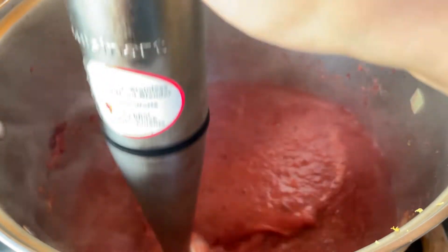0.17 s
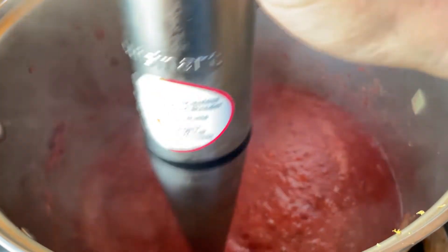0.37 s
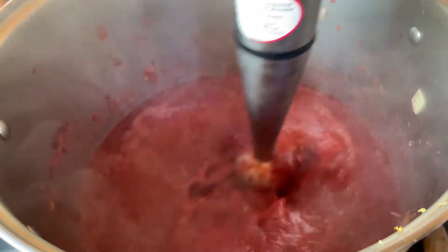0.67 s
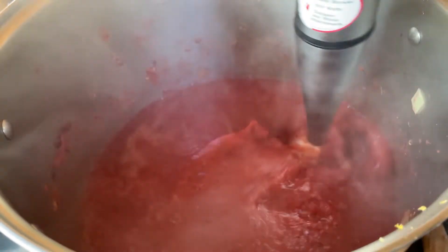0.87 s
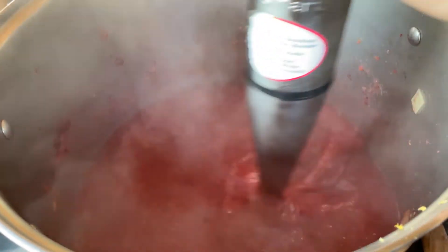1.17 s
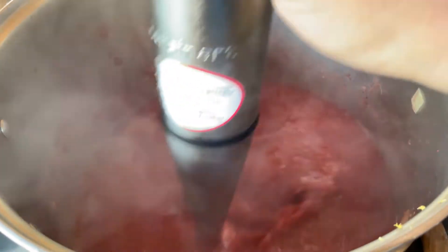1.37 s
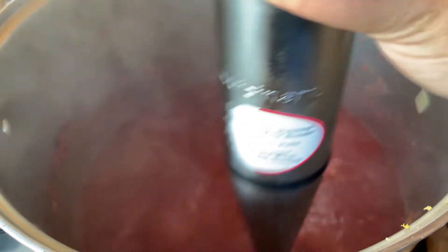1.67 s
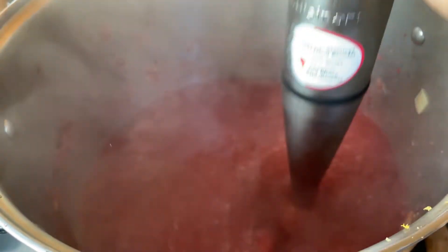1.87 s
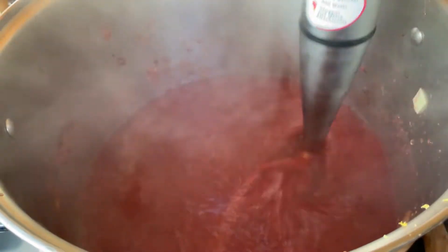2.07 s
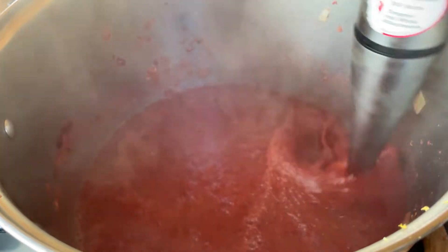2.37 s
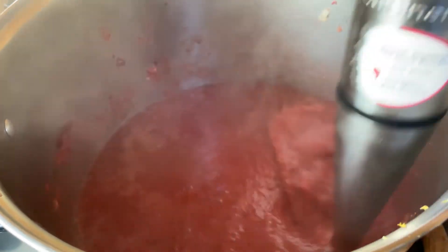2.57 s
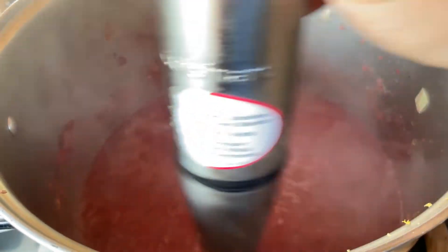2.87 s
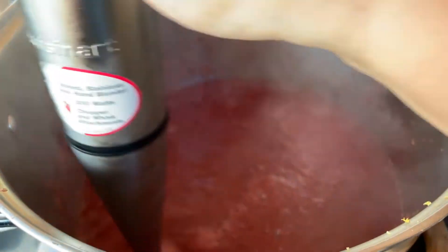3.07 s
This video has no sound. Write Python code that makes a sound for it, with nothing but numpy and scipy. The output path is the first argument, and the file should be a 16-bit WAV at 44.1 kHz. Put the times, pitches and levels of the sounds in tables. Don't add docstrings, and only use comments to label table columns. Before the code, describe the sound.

A hand blender beats thick sauce in a steel pot, its low boomy hum surging and dropping out, with wet splats and spatter, then stopping near 2.5 seconds; close phone microphone, stereo.

```python
import sys
import numpy as np
from scipy import signal
from scipy.fft import rfft, irfft, next_fast_len
from scipy.io import wavfile
from scipy.ndimage import uniform_filter1d, map_coordinates

SR = 44100
rng = np.random.default_rng(int(sys.argv[2]) if len(sys.argv) > 2 else 0)


def to_linear_factor(level_db):
    exponent = np.asarray(level_db, float) / 20
    return 10 ** exponent


def dump(signal):
    limited = np.clip(np.atleast_2d(signal).T, -1, 1)
    pcm = np.round(limited * 32767).astype(np.int16)
    wavfile.write(sys.argv[1], SR, pcm)


N = 141120

# (t/s, boom level/dB, once-a-turn thud over the boom/dB, smooth running 0-1)
MOTOR_RUN = [(0, -25, -22, 0.04), (.18, -43, -4, 0), (.39, -14.5, -19.5, 0.2), (.88, -20, -14.5, 0.84),
             (.97, -35, -13, 0.02), (1.1, -41.5, -14, 0.44), (1.2, -14, -24, 0.7), (1.41, -24.5, -20.5, 1),
             (1.47, -18.5, -15.5, 0.86), (1.6, -19, -34.5, 0.9), (1.67, -14, -2.5, 0),
             (1.745, -15.5, -6.5, 0.96), (1.86, -28, -32, 0.4), (1.95, -18.5, -16, 0.25),
             (2.29, -18, -27, 0.1), (2.36, -5.5, -34, 0.76), (2.505, -23.5, -22, 0.16),
             (2.53, -42.5, -6.5, 0.1)]
# (t/s, f/Hz); two blades, so the shaft turns at half of this
BLADE_SPEED = [(0, 372), (.3, 352), (.36, 325), (.4, 346), (.7, 333), (.88, 327), (.96, 290), (1.12, 280),
               (1.2, 320), (1.3, 333), (1.6, 327), (1.67, 314), (1.76, 330), (1.84, 350), (2.3, 352),
               (2.36, 341), (2.5, 355)]
SIDES = np.array([[.5], [-.5]])


def unit(x):
    return x / np.sqrt(np.mean(x ** 2) + 1e-20)


def along(points, hz):
    f, v = np.transpose(points)
    return np.interp(np.log(hz + 1), np.log(f + 1), v)


def curves(rows):
    s, *cols = np.transpose(rows)
    return [np.interp(np.arange(N) / SR, s, c) for c in cols]


def wobble(rate):
    return map_coordinates(rng.standard_normal(N // 20), [np.arange(N) * rate / SR])


def filtered(x, response):
    m = next_fast_len(N + 8192)
    return irfft(rfft(x, m) * response(np.fft.rfftfreq(m, 1 / SR)), m)[..., :N]


def uneven(draw, spread_db):
    return to_linear_factor(-spread_db * np.log(draw + 0.012))


def spread(pair, spectrum):
    # (f/Hz, left-right likeness 0-1)
    likeness = [(100, 0.91), (300, 1), (800, 0.55), (3000, 0.67), (7000, 0.34), (12000, 0.94)]

    def response(hz):
        turn = np.arccos(np.clip(along(likeness, hz), -1, 1)) / 2
        return to_linear_factor(along(spectrum, hz)) * [np.cos(turn), np.sin(turn)]

    mid, side = filtered(pair, response)
    return unit(np.array([mid + side, mid - side]))


def patchy(patchy_db):
    z = signal.stft(rng.standard_normal((2, N)), nperseg=256)[2]
    field = uniform_filter1d(rng.standard_normal(z.shape[1:]), size=8, axis=0)
    field = uniform_filter1d(field, size=5, axis=1)
    return unit(signal.istft(z * to_linear_factor(patchy_db * unit(field)), nperseg=256)[1][:, :N])


def hiss():
    # (f/Hz, level/dB per Hz)
    hiss_color = [(40, -10), (100, 16), (300, 2), (1000, -6), (5000, -8), (15500, -7), (17000, -120)]
    return to_linear_factor(-56) * spread(patchy(patchy_db=7.5), hiss_color)


def grip():
    # (t/s, rumble level/dB)
    grip_level = [(0, -51), (.1, -47), (1.62, -66), (1.7, -34), (2.4, -44), (3.2, -44.5)]
    # (f/Hz, level/dB per Hz)
    grip_color = [(15, -46), (40, -15.5), (120, 7.5), (280, 2.5), (450, -66)]
    return to_linear_factor(curves(grip_level)[0] + 3.5 * wobble(14)) * spread(patchy(patchy_db=1.5), grip_color)


def pot(f):
    # (f/Hz, width/Hz, level/dB)
    resonances = [(344, 34, 16), (825, 29, 3.5), (166, 48, -40), (1310, 1180, -21.5)]
    total = 0
    for k, (c, w, db) in enumerate(resonances):
        total = total + (-1) ** k * to_linear_factor(db) * 1j * f * w / (c * c - f * f + 1j * f * w)
    return total


def walls(x):
    t = np.arange(6000) / SR
    tail = rng.standard_normal((2, len(t))) * to_linear_factor(-60 * t / 0.18)
    return signal.fftconvolve(x, tail / np.linalg.norm(tail[0]), axes=1)[:, :N]


def pops(life_s):
    draw = rng.random((2, N))
    size = (draw[0] < 340 / SR) * uneven(draw[1], spread_db=4.5)
    puff = signal.fftconvolve(size, np.exp(-np.arange(800) / SR / life_s))[:N]
    return unit(puff * rng.standard_normal((2, N)))


def bubbles(count):
    d, t = rng.random((count, 4)), np.arange(256) / SR
    clump = np.cumsum(to_linear_factor(4.5 * wobble(40)))
    start = np.searchsorted(clump / clump[-1], d[:, :1])
    hz = 2250 * 2 ** (0.597 * rng.standard_normal((count, 1)))
    ring = np.exp(-t * hz / 2.3) * np.sin(2 * np.pi * hz * t * (1 + 25 * t))
    chirp = uneven(d[:, 1:2], spread_db=3) * ring
    at = (start + np.arange(len(t))).ravel()
    direction = 7 * d[:, 2:3]
    pair = [np.bincount(at, (chirp * w(direction)).ravel(), N)[:N] for w in (np.cos, np.sin)]
    return unit(np.array(pair))


def churn():
    # (t/s, churning level/dB, spray over it/dB, slosh over it/dB)
    stirring = [(.05, -33, -3, -2.5), (.3, -40.5, -2.5, 10.5), (.41, -23.5, -8.5, 5.5), (.6, -28, -6.5, 4),
                (.87, -36, -3, 13.5), (.93, -50, 2.5, 13.5), (1.18, -42.5, -4, 8), (1.6, -34.5, -7.5, 10),
                (1.655, -32, -11.5, 12), (1.675, -19.5, -9.5, 0.5), (1.74, -26.5, -8, 12),
                (1.85, -38, -7, 8), (2.33, -41, -7, 8.5), (2.375, -28.5, -6, 2), (2.42, -38.5, -3, 5),
                (2.85, -47.5, -0.5, 10), (3.14, -38.5, -7.5, 3), (3.165, -46, -10, 6)]
    # (f/Hz, level/dB per Hz)
    slosh_color = [(60, -44), (150, -4.5), (340, 8.5), (520, -9), (820, 0), (1600, -17), (3000, -96)]
    body_color = [(500, -28.5), (900, -4.5), (2500, -4.5), (4500, -11), (7500, -32), (10000, -100)]
    spray_color = [(3000, -7), (5500, -1.5), (8000, -2.5), (10000, -3), (12500, -9.5), (15500, -10.5),
                   (16200, -42), (17000, -120)]
    level_db, spray_db, slosh_db = curves(stirring)
    surge_db = 1.6 * wobble(29.63)
    slosh = spread(patchy(patchy_db=3.5), slosh_color) * to_linear_factor(0.5 + slosh_db + 0.86 * wobble(20))
    torn = patchy(patchy_db=4.0) + to_linear_factor(-8) * bubbles(count=5000)
    body = spread(torn, body_color) * to_linear_factor(-1 + surge_db)
    fizz = patchy(patchy_db=3.5) + to_linear_factor(-5.5) * pops(life_s=0.00024)
    spray = spread(fizz, spray_color) * to_linear_factor(1.5 + spray_db + surge_db)
    return to_linear_factor(level_db) * (slosh + body + spray)


def drops():
    # (t/s, peak level/dB, centre f/Hz)
    droplets = [(0.4085, -12.5, 8800), (0.4189, -17, 9900), (0.4359, -14, 8720), (0.5043, -22, 8950),
                (0.6479, -21.5, 12000), (0.6848, -16, 8810), (0.7274, -20, 9490), (0.7467, -20, 10100),
                (0.7614, -31, 10100), (0.7856, -21, 10000), (0.7984, -24, 11200), (0.8165, -19, 11100),
                (0.8629, -19, 11100), (1.4381, -21, 10900), (1.9714, -32, 11400), (2.8644, -37, 12100),
                (3.015, -30, 13600), (3.0824, -29, 11800), (3.1373, -23.5, 9260), (3.1954, -38, 11400)]
    out, t = np.zeros((2, N + SR)), np.arange(1024) / SR
    f = np.fft.rfftfreq(len(t), 1 / SR)
    for s, db, hz in droplets:
        noise = rng.standard_normal((2, len(t))) + 1.5 * rng.standard_normal(len(t))
        snap = unit(irfft(rfft(noise) * np.exp(-((f - hz) / 1600) ** 2)))
        out[:, round(s * SR):][:, :len(t)] += to_linear_factor(db - 4 - 60 * t / 0.015) * snap
    return out[:, :N]


def bloops():
    # (t/s, peak level/dB, f/Hz, time to die by 60 dB/s)
    pockets = [(.048, -22.5, 567, 0.083), (.447, -13.5, 2040, 0.026), (.449, -14.5, 4200, 0.02),
               (.469, -13.5, 3640, 0.017), (.498, -21, 3130, 0.034), (.703, -18, 4000, 0.026),
               (1.617, -18.5, 4420, 0.015), (1.633, -6.5, 1990, 0.02), (1.696, -17, 2170, 0.02),
               (1.694, -17, 4830, 0.016), (1.713, -14, 2250, 0.05), (1.735, -8.5, 2350, 0.015),
               (1.775, -16, 2750, 0.036), (2.292, -15.5, 763, 0.038), (2.378, -18, 1970, .05),
               (2.391, -26.5, 3100, 0.064), (2.417, -26, 1595, 0.067), (2.422, -19.5, 780, 0.053),
               (2.485, -33, 1660, 0.066), (2.49, -22.5, 795, 0.022), (2.504, -29, 2900, 0.042),
               (2.53, -30, 1560, 0.039), (3.032, -43, 320, 0.054), (3.095, -27.5, 1310, 0.049),
               (3.093, -24, 3660, 0.0246), (3.109, -27.5, 780, 0.078), (3.116, -22.5, 352, 0.12),
               (3.143, -19.5, 821, 0.035)]
    # (t/s, length/s, level/dB)
    slurps = [
        (1.921, 0.15, -27.5),
        (2.11, .1, -23),
    ]
    out, t = np.zeros(N + SR), np.arange(8192) / SR
    for s, db, hz, t60 in pockets:
        blur = .09 * np.cumsum(rng.standard_normal(len(t)))
        ring = np.sin(2 * np.pi * hz * t * (1 + .4 * t) + blur)
        out[round(s * SR):][:len(t)] += to_linear_factor(db - 60 * t / t60) * (1 - np.exp(-t / .0008)) * ring
    for s, length, db in slurps:
        u = np.clip(t / length, 0, 1)
        hz = 185 + (293.3 - 185) * np.sqrt(u)
        swell = to_linear_factor(db + 5.4 * wobble(37)[:len(t)]) * np.sin(np.pi * u)
        out[round(s * SR):][:len(t)] += swell * np.sin(2 * np.pi * np.cumsum(hz) / SR)
    return out[:N]


def splats():
    # (t/s, peak level/dB, f/Hz, left over right/dB)
    gobs = [(0.3407, -15.5, 1370, 1), (0.399, -4.5, 2140, -4), (0.7024, -10, 1240, -6),
            (0.7408, -9, 1260, 0), (0.812, -14.5, 1360, 1), (0.8497, -13, 3200, 0), (0.8679, -16, 3320, 15),
            (1.436, -12, 1270, 3), (1.612, -11, 1245, 6.5), (1.6772, -8.5, 2490, -3),
            (1.7337, -8, 2280, -8), (1.777, -10.5, 2600, -6), (1.816, -16.5, 1540, -13.5),
            (2.357, -13.5, 1180, 6), (2.441, -16, 1920, 1), (3.083, -17.5, 3140, 3),
            (3.1356, -10.5, 3270, 3)]
    # (f/Hz, level/dB per Hz)
    spit_color = [(400, -35), (1500, 13), (3500, 5.5), (6500, 2.5), (9000, -15), (16000, -25)]
    out, spits, kick = np.zeros((2, N + SR)), np.zeros((2, N + SR)), np.zeros(N)
    t = np.arange(2600) / SR
    for s, db, hz, pan_db in gobs:
        start = round(s * SR)
        gain = to_linear_factor(db - 0.5 + SIDES * (pan_db - 2.5)) * (1 - np.exp(-t / 0.00035))
        noise = rng.standard_normal((2, len(t))) + 2.0 * rng.standard_normal(len(t))
        pop = to_linear_factor(-60 * t / 0.0049) * np.sin(2 * np.pi * hz * t * (1 + 12 * t))
        out[:, start:][:, :len(t)] += gain * pop
        spits[:, start:][:, :len(t)] += gain * to_linear_factor(-16.5 - 60 * t / 0.019) * noise
        kick[start] = to_linear_factor(db - 26)
    spit = filtered(spits[:, :N], lambda f: to_linear_factor(along(spit_color, f)))
    thump = filtered(kick, lambda f: pot(f) * 1j * f / (150 + 1j * f))
    return out[:, :N] + spit + thump


def whine():
    boom_db = curves(MOTOR_RUN)[0]
    phase = np.cumsum(7530 + 60 * wobble(90)) * 2 * np.pi / SR
    return to_linear_factor(-66 - .15 * (boom_db + 30) + 7 * wobble(6)) * np.sin(phase)


def brushes():
    # (multiple of the shaft speed, level/dB)
    bars = [(36, -56.5), (72, -52.5)]
    turn = np.cumsum(curves(BLADE_SPEED)[0] * (1 + .014 * wobble(900))) * np.pi / SR
    running = np.clip((curves(MOTOR_RUN)[0] + 42) / 12, 0, 1)
    return running * sum(to_linear_factor(db + 2.3 * wobble(50)) * np.sin(k * turn) for k, db in bars)


def motor():
    # (t/s, boom change/dB, half length/s)
    gulps = [(0.272, -4, 0.025), (0.376, 1, 0.0085), (0.448, 10.5, 0.01), (1.308, -6, 0.026),
             (1.545, 0.5, 0.019), (1.631, 6, 0.017), (2.079, -9, 0.019), (2.2, 3, 0.11),
             (2.239, -1, 0.0063), (2.268, 10, .01), (2.278, -8, 0.02), (2.323, -5.5, .012),
             (2.383, 5, 0.0072), (2.496, 8.5, 0.012)]
    # (multiple of the shaft speed, level under the boom before the pot/dB, gain by smooth running/dB)
    overtones = [(4, -0.5, 10.5), (5, -3, 26.5), (6, -10, 10)]
    blade_hz, = curves(BLADE_SPEED)
    boom_db, thud_db, smooth = curves(MOTOR_RUN)
    gulp_db = sum(db * np.exp(-((np.arange(N) / SR - s) / half) ** 2) for s, db, half in gulps)
    lumpy = 1 - 0.61 * np.clip(smooth, 0, 1)
    turn = np.cumsum(blade_hz * (1 + .02 * lumpy * wobble(60))) * np.pi / SR
    even = np.cumsum(blade_hz) * np.pi / SR
    bite = to_linear_factor(3 * lumpy * wobble(60))
    boom = unit(bite * np.sin(2 * turn)) * to_linear_factor(-1) * (boom_db > boom_db[-1])
    thud = to_linear_factor(thud_db + 0.68 * wobble(24.26)) * np.sqrt(2) * np.sin(even)
    upper = 0
    for k, db, gain_db in overtones:
        level = to_linear_factor(db - 10.5 + gain_db * (smooth - 1) + 3 * wobble(30.06))
        upper = upper + level * np.abs(pot(k * blade_hz / 2)) * np.sin(k * turn)
    rough = unit(filtered(patchy(patchy_db=0.5)[0], lambda f: pot(f) * f ** 2 / (f ** 2 + 120 ** 2)))
    return to_linear_factor(boom_db + gulp_db) * (boom + thud + to_linear_factor(-5) * lumpy * rough + upper)


def scene():
    hits = splats() + drops() + bloops()
    return motor() + brushes() + whine() + churn() + grip() + hits + to_linear_factor(-11.5) * walls(hits)


def starved(x):
    # (f/Hz, half width/Hz, share of time dropped)
    dips = [(8000, 800, .66), (11350, 650, .5), (14100, 300, .6)]
    hz, t, z = signal.stft(x, SR, nperseg=1024)
    keep = np.tile((hz < 16100)[:, None], len(t))
    frame = np.minimum(np.arange(len(t)), N // 512 - 1)
    for c, w, share in dips:
        for band in (hz > c - w) & (hz <= c), (hz > c) & (hz < c + w):
            power = np.mean(np.abs(z[:, band]) ** 2, (0, 1))
            whole = np.mean(np.abs(z) ** 2, (0, 1))
            db = 10 * np.log10(power / whole ** 0.82) + 3.0 * wobble(20)[::512][frame]
            keep[band] &= db > np.quantile(db, share)
    return signal.istft(z * keep, SR, nperseg=1024)[1][:, :N]


def band_limit(x):
    return signal.sosfilt(signal.butter(12, 16370, fs=SR, output="sos"), x)


def record(dry):
    # (closes t/s, reopens t/s, depth/dB, sinking time/s)
    ducks = [
        (0.942, 1.105, -14, 0.11),
        (2.868, 3.015, -13, .03),
    ]
    # (f/Hz, left over right/dB)
    lean = [(60, 1.5), (240, -2.5), (950, -1.5), (3770, -5.5), (15000, 1.5)]
    # (f/Hz, left ahead of right/radians)
    lead = [(0, 0.5), (3200, -1.07), (5600, 1.5), (6700, -4), (8000, -6), (9200, 1.02)]
    t = np.arange(N) / SR
    duck_db = 0
    for a, b, db, sink in ducks:
        duck_db = duck_db + db * np.clip(np.minimum((t - a) / sink, (b - t) / .003 + 1), 0, 1)

    def ports(hz):
        return to_linear_factor(along(lean, hz) * SIDES) * np.exp(1j * along(lead, hz) * SIDES)

    x = filtered(dry * to_linear_factor(duck_db) + hiss(), ports)
    x = starved(x / (1 + np.abs(x / .97) ** 6) ** (1 / 6))
    return band_limit(x)


dry = scene()
out = record(dry)
dump(out)
```